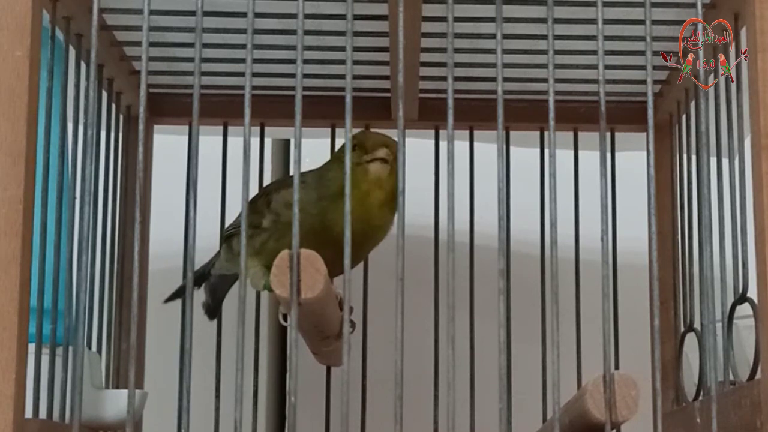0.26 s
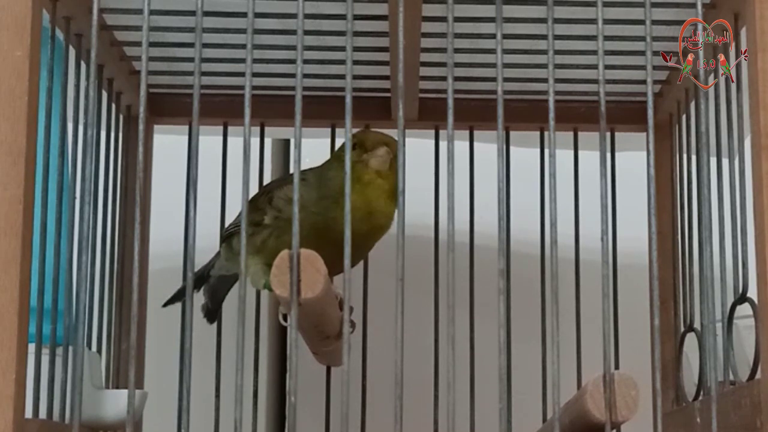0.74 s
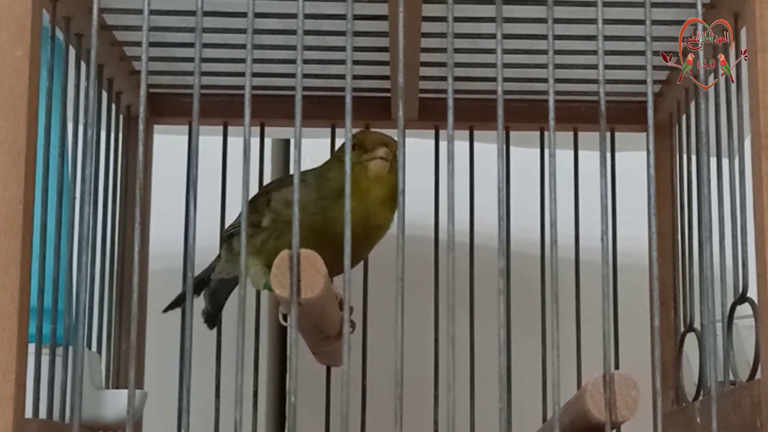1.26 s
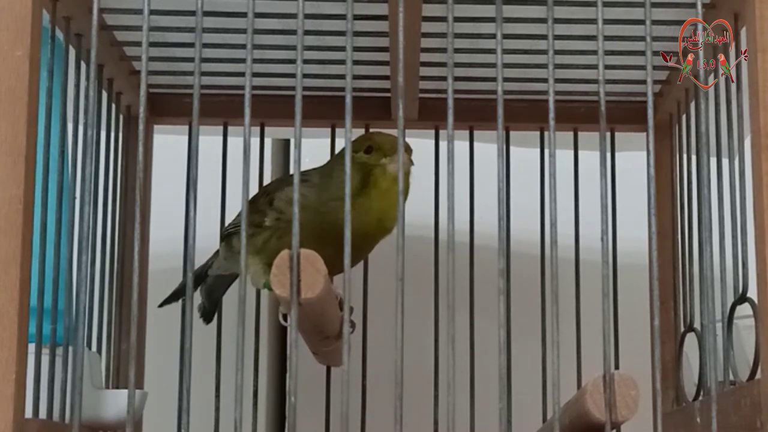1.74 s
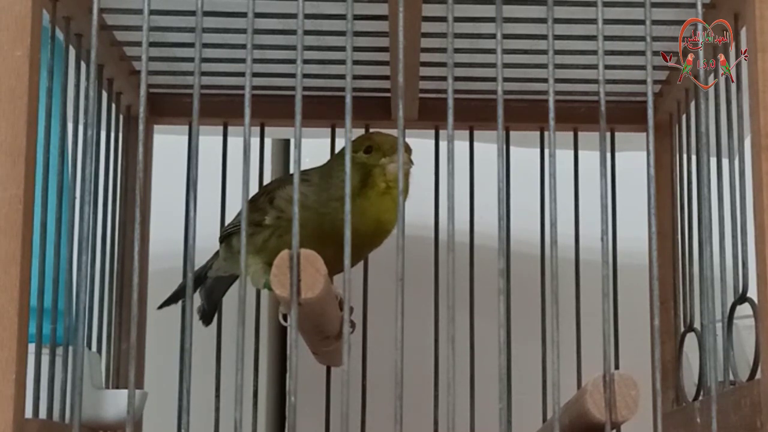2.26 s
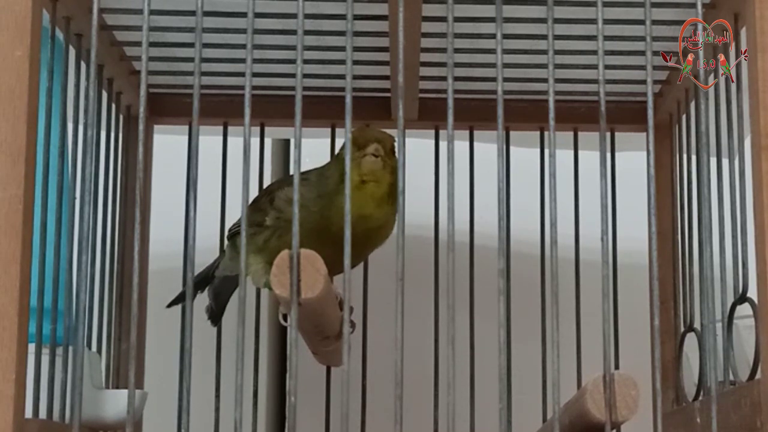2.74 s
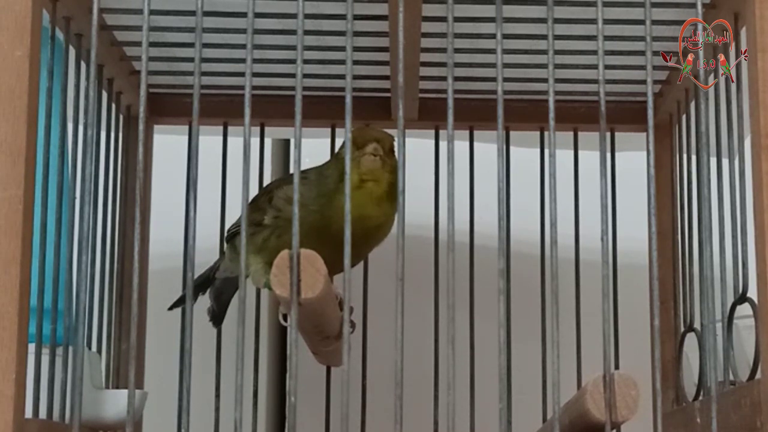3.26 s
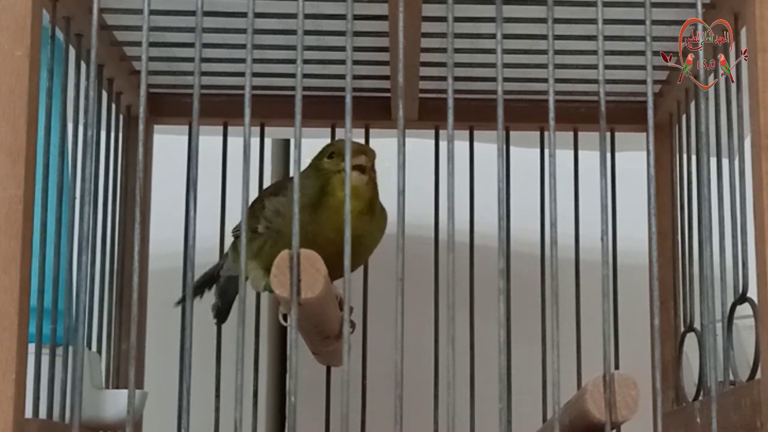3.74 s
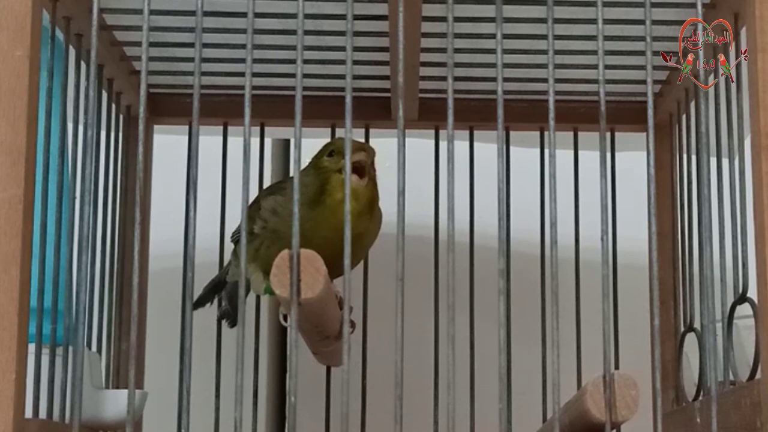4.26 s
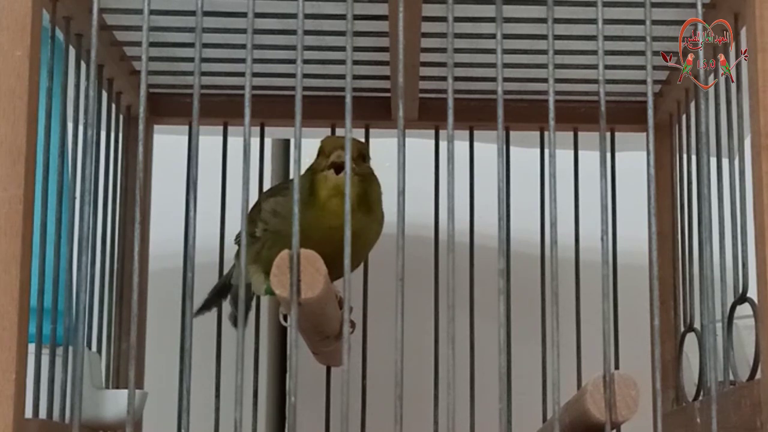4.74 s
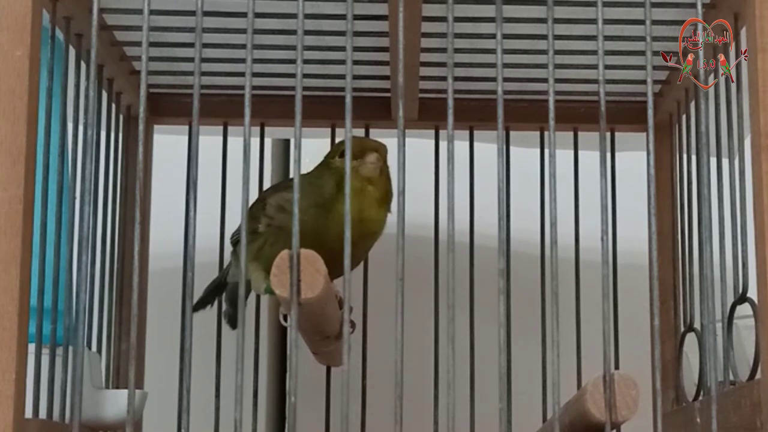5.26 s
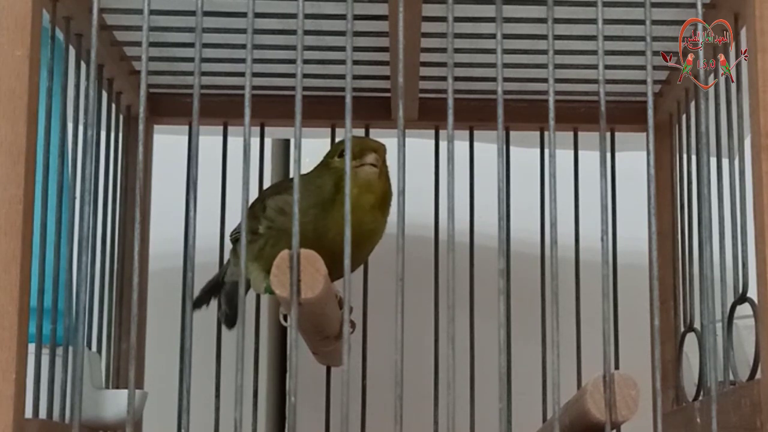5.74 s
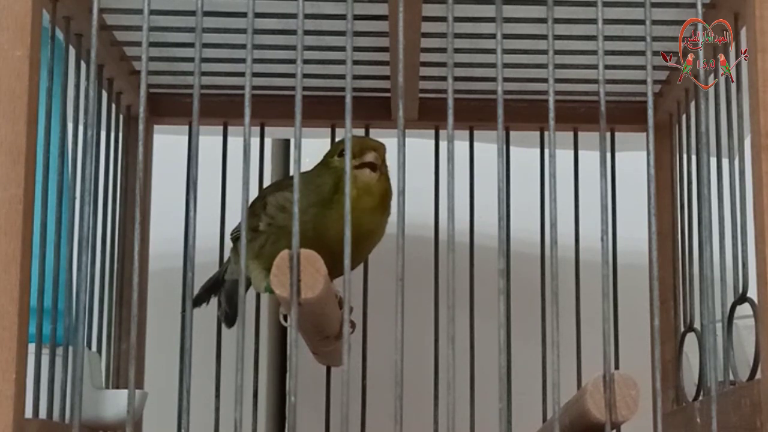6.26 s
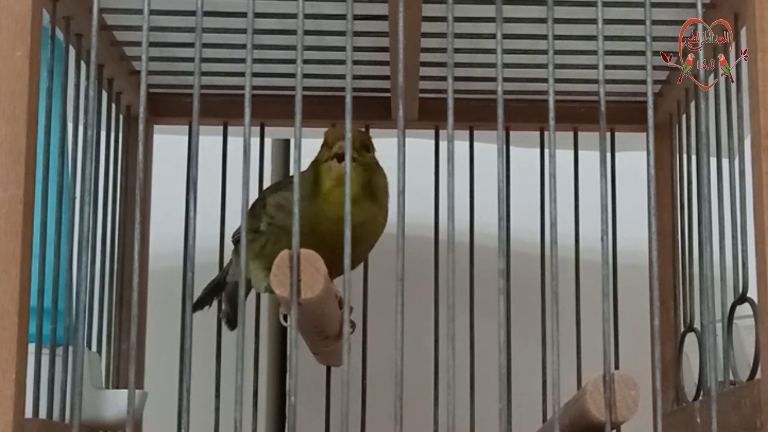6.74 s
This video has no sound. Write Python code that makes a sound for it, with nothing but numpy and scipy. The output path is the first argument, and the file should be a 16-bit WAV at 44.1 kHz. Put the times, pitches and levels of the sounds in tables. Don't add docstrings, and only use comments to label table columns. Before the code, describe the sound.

Indoors, near the microphone, one caged canary delivers changing phrases almost without pause: brisk dry chups with bright ticks, a four-part chirping pattern, softer long whistles sliding up to wavering tops, then a piercing alternating trill at full strength. Chups return, and it finishes on quick groups of high pip, rising chirp and strong falling note. Hard walls give short, bright echoes in stereo; hum and hiss are barely audible.

```python
import sys
import numpy as np
from scipy import signal
from scipy.fft import irfft
from scipy.io import wavfile
from scipy.ndimage import uniform_filter1d

SR = 44100
rng = np.random.default_rng(int(sys.argv[2]) if len(sys.argv) > 2 else 0)


def magnitude_from_level(level_db):
    exponent = np.asarray(level_db, float) / 20
    return 10 ** exponent


def master(y):
    cut = np.clip(np.atleast_2d(y).T, -1, 1)
    pcm = np.round(cut * 32767)
    wavfile.write(sys.argv[1], SR, pcm.astype(np.int16))


N = 309141
LEAD = SR // 5

# (time [s], peak
# level [dB], pitch [Hz])
TICKS = [(-.03, -24.5, 4804), (3.763, -24, 5690), (0.0751, -22, 5070), (0.186, -24, 5200),
         (0.2866, -24.5, 5130), (0.3886, -22.5, 4900), (0.4988, -24.5, 4700), (0.6084, -23, 4637),
         (0.7121, -26, 4285), (0.8161, -25, 4520), (0.9295, -27.5, 4810), (1.19, -21.5, 5160),
         (1.4245, -22, 5164), (1.6705, -25, 5310), (5.0162, -24, 4840), (5.1262, -22.5, 5165),
         (5.2276, -23.5, 4840), (5.3442, -25.5, 4840), (5.4543, -27, 4755), (5.5576, -24.5, 4720),
         (5.6615, -27, 4605), (5.7661, -23.5, 4870), (5.878, -24, 4730), (5.9951, -25, 4170),
         (6.1168, -26.5, 4630)]
# (time [s], peak level [dB], pitch [Hz], depth of fall [ratio])
OPENING = [(.003, -17, 2560, 1.35)]
# (time [s], peak level [dB], pitch [Hz], depth of fall [ratio])
CHUPS = [(0.1031, -15, 2365, 1.06), (0.2117, -15, 2360, 1.02), (0.315, -15, 2390, 1.14),
         (0.417, -14.5, 2279, 1.01), (0.5269, -15, 2357, 1.07), (0.637, -14.5, 2297, 1.04),
         (0.7395, -14, 2282, 1.16), (0.8444, -17, 2227, 1.1), (0.9581, -15, 2300, 1.02),
         (5.047, -19, 2356, 1.15), (5.1553, -16, 2358, 1.16), (5.26, -17, 2230, 0.99),
         (5.374, -17.5, 2243, 1), (5.4851, -15.5, 2350, 1.04), (5.585, -16, 2340, 1.01),
         (5.69, -16.5, 2300, 1.02), (5.7947, -16.5, 2363, 1.11), (5.905, -16.5, 2240, 1.16),
         (6.0222, -19, 2165, 1.08), (6.144, -18, 2194, 1.03)]
# (time [s], peak level [dB], pitch [Hz])
UPS = [(1.035, -22.5, 6110), (1.2675, -23, 6200), (1.501, -21.5, 6200), (1.744, -22.5, 6240)]
# (time [s], peak level [dB], pitch [Hz])
DOWNS = [(1.086, -22.5, 1957), (1.328, -20.5, 2116), (1.5582, -20, 2118), (1.805, -22, 2100)]
# (time from the fall [s], level re the fall [dB])
STUTTER = [
    (-.006, -7),
    (.0005, -1),
]
# (time [s], peak level [dB], pitch [Hz])
CHOPS = [(1.213, -12.5, 2744), (1.449, -13, 2803), (1.693, -12.5, 2786)]
# (time [s], peak level [dB], pitch [Hz], depth of sag [ratio])
HIGHS = [(-0.13, -20, 5346, .7), (3.7627, -31.5, 5365, -0.06), (3.8765, -21, 5477, 0.24),
         (3.992, -18, 5496, 0.19), (4.1046, -19, 5476, 0.33), (4.221, -19, 5388, -0.57),
         (4.3355, -18.5, 5491, 1), (4.446, -19, 5465, .8), (4.559, -19, 5460, 0.47), (4.672, -17, 5500, .2),
         (4.785, -19.5, 5510, 1), (4.8981, -18.5, 5494, .7)]
# (time [s], peak level [dB], pitch [Hz], depth of bend [ratio])
LOWS = [(-0.12, -6, 3880, 0.72), (3.8188, -13.5, 3670, 0.59), (3.9345, -12.5, 3750, 0.87),
        (4.0513, -12.5, 3837, 0.85), (4.1643, -11.5, 3838, 0.32), (4.279, -12.5, 3850, 1.2),
        (4.391, -13.5, 3898, 0.97), (4.5035, -14, 3973, 0.91), (4.615, -10.5, 3842, 0.83),
        (4.732, -11.5, 3830, 0.71), (4.8396, -12, 3834, 0.62), (4.957, -12, 3852, 1.1)]
# (time [s], peak level [dB], pitch [Hz], depth of bend [ratio])
PIPS = [(6.2216, -22.5, 6125, 0.81), (6.378, -27.5, 6110, 0.44), (6.524, -30, 6055, 0.62),
        (6.679, -35.5, 6154, 0.79), (6.8356, -25, 6057, 0.94), (6.9867, -29, 6150, 0.76)]
RISES = [(6.2439, -22.5, 4025, 1.3), (6.3992, -21.5, 4184, 0.48), (6.545, -22, 4080, 1.2),
         (6.7007, -21, 4196, 0.54), (6.8572, -20, 4040, .9), (7.0063, -21.5, 4160, 1)]
DROPS = [(6.2985, -13, 2770, 1.46), (6.4532, -11, 2782, 1.04), (6.6001, -12, 2793, 1.11),
         (6.7572, -11, 2720, 1.1), (6.911, -11.5, 2696, 0.86)]

# (time [ms], pitch [Hz], level re peak [dB])
TICK = [(-.5, 4500, -22), (.4, 4680, -5), (1.2, 4800, -1), (2, 4880, 0), (2.8, 5020, -3), (3.5, 4900, -10),
        (4.3, 4850, -9), (5.6, 4800, -30)]
CHUP = [(-2, 2300, -30), (-.3, 2370, -6), (1.8, 2420, .5), (4.6, 2310, 1), (5.8, 1960, -9),
        (9, 1780, -12.5), (13, 1670, -19), (19, 1590, -24.5), (23, 1580, -45)]
UP = [(-2, 5400, -25), (0, 5650, -2), (3, 5950, 0), (9, 6380, -4), (13, 6720, -7), (16.5, 7020, -7),
      (24, 7430, -10), (31, 7640, -18), (33, 7670, -40)]
BLIP = [(-2.5, 2350, -32), (0, 2290, 0), (2.5, 2220, -32)]
DOWN = [(4.5, 2400, -25), (6.5, 2280, 0), (8.5, 1640, -11), (12, 1590, -10), (24, 1530, -15),
        (36, 1300, -17), (45, 1020, -21), (55, 930, -25), (58, 920, -45)]
CHOP = [(.5, 2450, -32), (2.5, 2620, -5), (6, 2850, 0), (10, 2850, 0), (14, 2680, -7), (16, 2150, -12),
        (19, 1550, -19), (22, 1330, -25), (24, 1280, -45)]
HIGH = [(-2.5, 5520, -26), (-.5, 5500, -10), (2, 5480, -4), (8, 5455, -1.5), (22, 5375, -.5), (34, 5350, 0),
        (39, 5430, -2), (42, 5600, -28)]
LOW = [(-3, 3700, -30), (0, 3680, -12), (4, 3740, -3), (9, 3810, 0), (15, 3880, 0), (19, 3990, -4),
       (22, 4170, -11), (25, 4260, -30)]
PIP = [(-2, 6330, -24), (0, 6240, -5), (3, 6170, -3), (7, 6140, 0), (12, 6170, -3), (15, 6350, -24)]
RISE = [(-3, 3000, -34), (-.5, 3600, -18), (1.5, 4040, -7), (5, 4080, -4), (14, 4130, -1), (22, 4200, 0),
        (30, 4300, -3), (36, 4340, -30)]
DROP = [(-2, 2600, -32), (1, 2700, -10), (5, 2770, -2), (9, 2620, -.5), (13.3, 2300, 0), (14.5, 2080, -13),
        (18, 1880, -22), (21, 1800, -45)]
# (gesture, levels of overtones 2, 3, 4.. [dB], air level [dB], rasp [0-1])
KINDS = [(TICK, (-23, -29.5), -23.5, 0.25), (CHUP, (-33, -57.5, -48.5), -43.5, 0.003), (UP, (-34.5,),
         -43.5, 0.011), (BLIP, (-30, -52.5), -31, .03), (DOWN, (-27, -43), -38.5, .01),
         (CHOP, (-31, -48.5, -63.5), -47, .006), (HIGH, (-32, -55.5), -49.5, 0.0021),
         (LOW, (-42, -43, -48.5), -45, 0.0029), (PIP, (-35.5,), -29, 0.061), (RISE, (-36, -44.5),
         -34.5, .006), (DROP, (-46.5, -56.5, -63.5, -52.5), -39.5, 0.0054)]

# (frequency [Hz], left minus right level [dB], left lead [rad])
PORTS = [(800, -3, -.2), (1500, -4, -.5), (1900, -7.5, -.1), (2400, -4.5, .05), (2950, -1, .45),
         (3250, -1.5, -1.3), (3650, -1.5, -.8), (3950, -7, -1.8), (4100, -8, .4), (4350, -6, -.5),
         (4600, -6, 1.7), (5420, 0, 2.1), (6150, 9, 2.2), (6700, 5, 0), (9000, 1, -1.6), (13000, -1, -1.3)]
# (frequency [Hz], level [dB])
CAPSULE = [(900, 0), (1400, -2.5), (2300, 0.5), (2900, -1.5), (3350, -3), (5400, 3), (6500, -1), (9500, 0)]
# (time [s], extra left minus right level [dB])
HEAD = [(0, -1), (1, 2.5), (2, -1), (3.002, -0.2), (3.699, 1), (4.3, -0.4), (4.7, 2.5), (5, 1), (6.199, 1),
        (7, -2.5)]
# (delay [ms], left level [dB], right level [dB])
ECHOES = [(1.7, 2, -8), (7.2, -6, -7), (13.8, -1, -6), (19.3, -14, -18), (25, -12, -16), (28.5, -12, -17),
          (38, -14, -14)]
# (frequency [Hz], early echo level [dB], tail level [dB])
BEAM = [(910, -19.5, -12.5), (2300, -25, -15.5), (3200, -24, -16), (3500, -11, -10.5), (4230, -23.5, -14),
        (4170, -7, -2.5), (5500, -17.5, -6.5), (6960, -17.5, -10.5), (11100, -18.5, -8), (16800, 2.5, -2.5)]
# (frequency [Hz], t60 [s])
ROOM = [(1000, 0.43), (2500, 0.4), (5000, 0.36), (9000, 0.29), (16000, 0.59)]

# (frequency [Hz], level [dB])
HISS = [(20, -6.5), (60, -0.5), (110, 0), (250, -1.5), (440, -1), (900, -4.5), (2000, -14), (3500, 0),
        (4500, -26.5), (8000, -28.5), (16000, -45)]
# (frequency [Hz], likeness [-1 to 1])
SAME = [(30, 0.95), (70, 0.65), (150, 0.38), (600, 0.45), (16000, 0.9)]
# (time [s], level [dB])
HOUSE = [(0.0, -77.5), (0.58, -76.5), (1.44, -75), (1.97, -77.5), (3.0, -78), (3.53, -76), (4.46, -75),
         (5.24, -78), (6.76, -74), (7.0, -75.5)]
# (time [s], level [dB])
HUM = [(0.0, -95), (0.04, -83), (0.76, -79), (1.6, -80), (1.67, -78), (2.53, -79.5), (2.57, -88.5),
       (4.09, -77.5), (5.22, -82.5), (5.32, -89), (5.69, -75), (7.0, -83)]

# (time from start [s], pitch over first note [Hz], level [dB])
CLIMB = [(0, 2, -31), (0.023, 13, -30), (0.055, 270, -23), (0.074, 498, -27), (.102, 618, -29.5),
         (.13, 880, -19.5), (0.155, 1207, -25.5)]
# (time from start [s], pitch [Hz], level [dB])
JOIN = [(0.028, 3473, -74), (0.044, 3560, -59), (0.066, 3720, -49.5), (0.097, 3550, -49), (.122, 3720, -43),
        (0.134, 3550, -60.5)]
# (start time [s], slowness of climb [ratio], first note [Hz], effort [dB])
FULL = [
    (2.188, 1.024, 1898, -1),
    (2.651, 0.93, 1918, 1.5),
    (3.135, 1.015, 1954, -0.5),
]
# (time [s], pitch [Hz], level [dB])
HELD = [
    [(2.398, 3319, -27), (2.49, 3333, -32), (2.52, 3353, -24.5), (2.55, 3341, -28), (2.556, 3290, -37)],
    [(2.83, 3300, -25.5), (2.878, 3430, -26.5), (2.89, 3367, -30.5), (2.926, 3378, -24.5),
     (2.938, 3326, -37.5), (2.95, 3350, -29.5), (2.966, 3273, -27.5), (2.98, 3340, -26),
     (3.045, 3263, -38.5)],
    [(3.315, 3394, -25.5), (3.402, 3360, -26.5), (3.411, 3450, -30), (3.43, 3380, -31),
     (3.488, 3340, -23.5), (3.502, 3342, -23), (3.508, 3250, -41)],
]
# (time [s], pitch [Hz], level [dB])
SHORT = [
    [(1.926, 1892, -34), (1.956, 1987, -27.5), (1.998, 2067, -29.5), (2.072, 2137, -31),
     (2.093, 2136, -32.5)],
    [(3.597, 1935, -33), (3.619, 1930, -27), (3.677, 2340, -27), (3.697, 2237, -28.5), (3.72, 2173, -37)],
]
# (time [s], pitch [Hz], level [dB])
SHORT_JOIN = [
    [(1.955, 3586, -64), (2.059, 3715, -39.5), (2.083, 3795, -28.5), (2.093, 3674, -28.5)],
    [(3.625, 3416, -58), (3.655, 3670, -59.5), (3.695, 3490, -44.5), (3.725, 3356, -45.5)],
]
WHISTLE_OVERTONES_DB = (-41, -47.5, -51.5)
MIXED = [(-1, 1), (3, -1), (1, 1), (-2, 2), (4, -1), (-1, 2), (2, 0), (3, 0), (2, 1)]
MIXED_DB = [-26, -24, -37, -39.5, -53.5, -51.5, -35, -48, -57]

# (time [s], peak level [dB])
CLICKS = [(3.8168, -50.5), (3.8362, -40), (3.871, -54), (3.9037, -48.5), (4.0323, -53), (4.047, -57.5),
          (4.1321, -64.5), (4.1444, -59.5), (4.173, -50), (4.2852, -53), (4.2852, -47.5), (4.3313, -62),
          (4.373, -52.5), (4.4848, -54), (4.5207, -49.5), (4.553, -57.5), (4.5945, -53.5), (4.61, -54),
          (4.6699, -56), (4.7143, -51.5), (4.7252, -52), (4.751, -48), (4.8195, -71), (4.9233, -61.5),
          (4.9517, -50), (5.0151, -47)]
# (time [s], peak level [dB], left minus right level [dB])
JOLTS = [(4.011, -61, -3), (4.22, -62.5, -9), (4.288, -66, -5.5), (4.364, -62.5, -10), (4.474, -63.5, -4),
         (4.583, -61, -11), (4.699, -61, 3)]


def read(points, hz, column=1):
    table = np.transpose(points)
    return np.interp(np.log(hz + 1), np.log(table[0] + 1), table[column])


def add(mix, s, sound):
    part = mix[LEAD + round(s * SR):][:len(sound)]
    part += sound[:len(part)]


def unsteady(size, samples):
    x = rng.standard_normal(size + 2000)
    x = uniform_filter1d(uniform_filter1d(x, samples), samples)
    return (x / x.std())[1000:1000 + size]


def air(size):
    band = signal.butter(5, [1700, 6500], "bandpass", fs=SR, output="sos")
    return signal.sosfilt(band, rng.standard_normal(size))


def turns_of(hz, flutter):
    return 2 * np.pi * (rng.random() + np.cumsum(hz * (1 + flutter * unsteady(len(hz), 40))) / SR)


def tone(hz, turns, overtones_db):
    sound = np.sin(turns)
    for k, db in enumerate(overtones_db, 2):
        sound = sound + magnitude_from_level(db) * (k * hz < SR / 2) * np.sin(k * turns)
    return sound


def song():
    blips = [(s + early, db + weaker_db, hz) for s, db, hz in DOWNS for early, weaker_db in STUTTER]
    times = [TICKS, OPENING + CHUPS, UPS, blips[1:], DOWNS, CHOPS, HIGHS, LOWS, PIPS, RISES, DROPS]
    return [(when, *kind) for when, kind in zip(times, KINDS)]


def syllable(t, hz, overtones_db, air_db, rasp):
    turns = turns_of(hz, 0.0027)
    loose = turns + 0.16 * unsteady(len(t), 70)
    overtones = tone(hz, loose, overtones_db) - np.sin(loose)
    ragged = magnitude_from_level(2.5 * unsteady(len(t), 110)) * overtones
    shake = unsteady(len(t), 22) * np.sin(turns) + unsteady(len(t), 22) * np.cos(turns)
    return np.sin(turns) + rasp * shake + ragged + magnitude_from_level(air_db) * air(len(t))


def syllables():
    out = np.zeros(N + LEAD)
    for times, gesture, overtones_db, air_db, rasp in song():
        ms, shape_hz, shape_db = np.transpose(gesture)
        t = np.arange(ms[0], ms[-1], 1000 / SR)
        usual_hz = np.mean([row[2] for row in times])
        ends = np.clip(np.minimum(t - ms[0], ms[-1] - t), 0, 1)
        swell = ends * np.interp(t, ms, magnitude_from_level(shape_db))
        swell = np.convolve(swell, np.hanning(41) / 20, "same")
        speaks = np.argmax(swell > 0.7 * swell.max())
        for s, db, pitch_hz, *depth in times:
            hz = uniform_filter1d(np.interp(t, ms, shape_hz), 40) * pitch_hz / usual_hz
            bend = np.prod(depth) + 0.035 * rng.standard_normal()
            hz[speaks:] = hz[speaks] * (hz[speaks:] / hz[speaks]) ** bend
            hz *= 1 + 0.0059 * unsteady(len(t), 300)
            voice = syllable(t, hz, overtones_db, air_db, rasp)
            breath_db = 0.7 * unsteady(len(t), 90) + 1.5 * np.tanh(t / 30) * unsteady(len(t), 200)
            add(out, s + ms[0] / 1000, swell * magnitude_from_level(db + breath_db) * voice)
    return out


def ports(x):
    hz = np.fft.rfftfreq(1024, 1 / SR)
    ratio = magnitude_from_level(read(PORTS, hz))
    right = np.sqrt(2 / (1 + ratio ** 2)) * magnitude_from_level(read(CAPSULE, hz))
    left = right * ratio * np.exp(1j * read(PORTS, hz, column=2))
    taps = np.roll(irfft([left, right]), 512, axis=1)[:, 1:] * np.hanning(1023)
    pair = [signal.oaconvolve(x, port, "same") for port in taps]
    turn_db = np.interp(np.arange(-LEAD, N) / SR, *np.transpose(HEAD)) / 2
    return pair * magnitude_from_level([turn_db, -turn_db])


def beamed(x, column):
    grid = np.linspace(0, SR / 2, 257)
    beam = signal.firwin2(255, grid, magnitude_from_level(read(BEAM, grid, column)), fs=SR)
    return signal.oaconvolve(x, beam, "same")[None]


def walls(x):
    taps = np.zeros((2, SR // 2))
    at = np.arange(220, SR // 2 - 20, 20)
    at = at + rng.integers(0, 20, (2, len(at)))
    signs = rng.choice([-1., 1.], at.shape)
    np.put_along_axis(taps, at, signs * magnitude_from_level(5.5 * rng.standard_normal(at.shape)), 1)
    hz, t, z = signal.stft(taps, SR, nperseg=256)
    build = 1 - np.exp(-t / 0.013)
    decay = magnitude_from_level(-60 * t / read(ROOM, hz)[:, None])
    tail = signal.istft(z * build * decay, SR, nperseg=256)[1]
    tail /= np.linalg.norm(tail, axis=1)[:, None]
    early = np.zeros((2, SR // 20))
    for ms, left_db, right_db in ECHOES:
        early[:, round(ms * SR / 1000)] = magnitude_from_level([left_db, right_db])
    late = signal.fftconvolve(beamed(x, column=2), tail, axes=1)[:, :len(x)]
    return late + signal.fftconvolve(beamed(x, column=1), early, axes=1)[:, :len(x)]


def hiss():
    frames, hz = N // 512 + 5, np.fft.rfftfreq(2048, 1 / SR)
    a, b, c, d = rng.standard_normal((frames, 1025, 4)).T
    same = np.clip(read(SAME, hz), -1, 1)[:, None]
    left = a + 1j * b
    right = same * left + np.sqrt(1 - same ** 2) * (c + 1j * d)
    z = np.array([left, right]) * magnitude_from_level(read(HISS, hz))[:, None]
    noise = signal.istft(z, nperseg=2048, noverlap=1536)[1][:, :N]
    band = signal.butter(4, [70, 600], "bandpass", fs=SR, output="sos")
    low = signal.sosfilt(band, noise.mean(0))
    noise_db = -1.26 + np.interp(np.arange(N) / SR, *np.transpose(HOUSE)) + 0.49 * unsteady(N, 3000)
    return noise / low.std() * magnitude_from_level(noise_db)


def hum():
    hum_hz = 49.3 + 0.55 * unsteady(N, 6000)
    hum_db = -1 + np.interp(np.arange(N) / SR, *np.transpose(HUM)) - unsteady(N, 9000)
    return np.sqrt(2) * magnitude_from_level(hum_db) * np.sin(2 * np.pi * np.cumsum(hum_hz) / SR)


def fan():
    fan_db = -91 + 2.4 * unsteady(N, 4000)
    fan_hz = 446 + 2.8 * unsteady(N, 3000)
    return np.sqrt(2) * magnitude_from_level(fan_db) * np.sin(2 * np.pi * np.cumsum(fan_hz) / SR)


def voices():
    top_hz = 3340
    for (start, slow, first_hz, effort_db), held in zip(FULL, HELD):
        squeeze = (top_hz - first_hz) / (top_hz - 1900)
        main = [(start + slow * s, first_hz + squeeze * hz, db + effort_db) for s, hz, db in CLIMB]
        yield main + held, [(start + slow * s, hz, db) for s, hz, db in JOIN]
    yield from zip(SHORT, SHORT_JOIN)


def whistles():
    out = np.zeros(N + LEAD)
    for main, second in voices():
        s, hz, db = np.transpose(main)
        s2, hz2, db2 = np.transpose(second)
        t = np.arange(s[0], max(s[-1], s2[-1]), 1 / SR)
        size = len(t)
        hz = uniform_filter1d(np.interp(t, s, hz), 300) * (1 + 0.0017 * unsteady(size, 450))
        hz2 = uniform_filter1d(np.interp(t, s2, hz2), 300) * (1 + 0.0053 * unsteady(size, 450))
        turns, turns2 = turns_of(hz, 0.002), turns_of(hz2, 0.006)
        edge = np.clip(np.minimum((t - s[0]) / 0.006, (s[-1] - t) / 0.004), 0, 1)
        edge2 = np.clip(np.minimum(t - s2[0], s2[-1] - t) / 0.0049, 0, 1)
        level_db = uniform_filter1d(np.interp(t, s, db), 200)
        level_db = level_db + 0.8 * unsteady(size, 250) + 0.6 * unsteady(size, 900)
        strength = edge * magnitude_from_level(level_db)
        joined = edge2 * strength
        coupling_db = -42 * (hz - 2100) / 1000
        mixed = np.zeros(size)
        for (m, n), mix_db in zip(MIXED, MIXED_DB):
            mixed += magnitude_from_level(mix_db + coupling_db + 4 * unsteady(size, 220)) * np.sin(m * turns + n * turns2)
        pure = tone(hz, turns, WHISTLE_OVERTONES_DB)
        sound = strength * pure
        sound -= 0.75 * joined * (pure - np.sin(turns))
        rush = magnitude_from_level(-35.5 + unsteady(size, 300)) * air(size)
        sound += joined * (mixed + rush)
        thin_breath = magnitude_from_level(-55 + 4 * unsteady(size, 200)) * np.diff(rng.standard_normal(size + 1))
        sound += np.clip((t - s2[0]) / 0.03, 0, 1) * joined * thin_breath
        sound += edge2 * magnitude_from_level(np.interp(t, s2, db2)) * np.sin(turns2)
        add(out, s[0], np.sqrt(2) * sound)
    return out


def perch():
    out, t = np.zeros(N + LEAD), np.arange(600) / SR
    for s in (2.955, 3.003):
        scratch = np.convolve(air(len(t)), np.hanning(24) / 12, "same")
        add(out, s, magnitude_from_level(-43) * np.exp(-t / 0.004) * scratch)
    return out


def beak():
    out, t = np.zeros(N + LEAD), np.arange(600) / SR
    band = signal.butter(2, [1500, 3300], "bandpass", fs=SR, output="sos")
    for s, db in CLICKS:
        burst = np.exp(-t / 0.00072) * rng.standard_normal(len(t))
        add(out, s, magnitude_from_level(db + 9) * signal.sosfilt(band, burst))
    return out


def cage():
    out, t = np.zeros((2, N + LEAD)), np.arange(4000) / SR
    band = signal.butter(2, [80, 300], "bandpass", fs=SR, output="sos")
    jolt_s = 0.012
    for s, db, pan_db in JOLTS:
        swell = t / jolt_s * np.exp(1 - t / jolt_s)
        thump = signal.sosfilt(band, swell * rng.standard_normal(len(t)))
        for port, side_db in zip(out, (pan_db / 2, -pan_db / 2)):
            add(port, s, magnitude_from_level(db - 2.5 + side_db) * thump / abs(thump).max())
    return out


def scene():
    bird = syllables() + whistles() + perch() + beak()
    heard = ports(bird) + walls(bird) + cage()
    return heard[:, LEAD:] + hiss() + hum() + fan()


def roll_off(x):
    return signal.sosfilt(signal.butter(12, 16490, fs=SR, output="sos"), x)


def record(dry):
    squared = signal.sosfilt(signal.butter(2, 2600, fs=SR, output="sos"), dry ** 2)
    bent = magnitude_from_level(-13.5) * squared - magnitude_from_level(-15.5) * dry ** 3
    bent = signal.sosfilt(signal.butter(2, 700, "highpass", fs=SR, output="sos"), bent)
    heard = signal.sosfilt(signal.butter(12, 15600, fs=SR, output="sos"), dry + bent)
    return roll_off(heard)


dry = scene()
out = record(dry)
master(out)
```